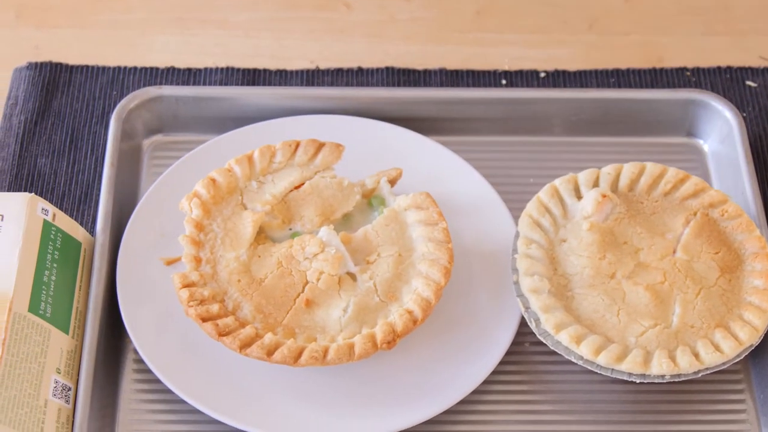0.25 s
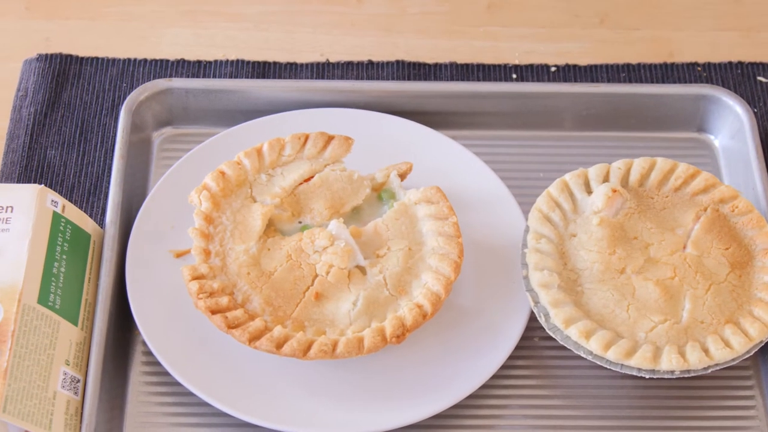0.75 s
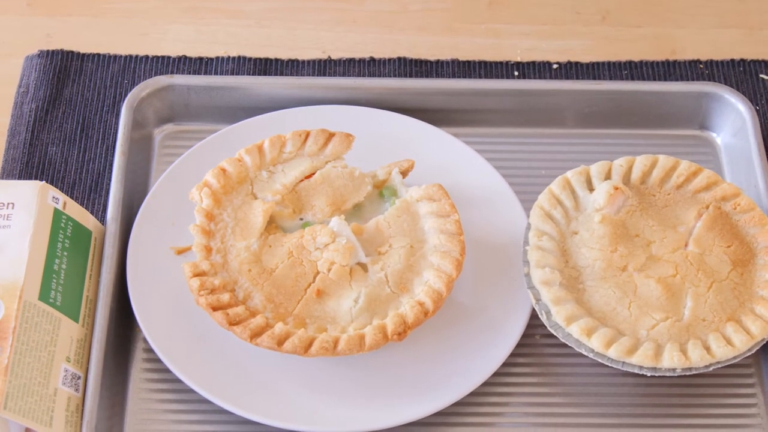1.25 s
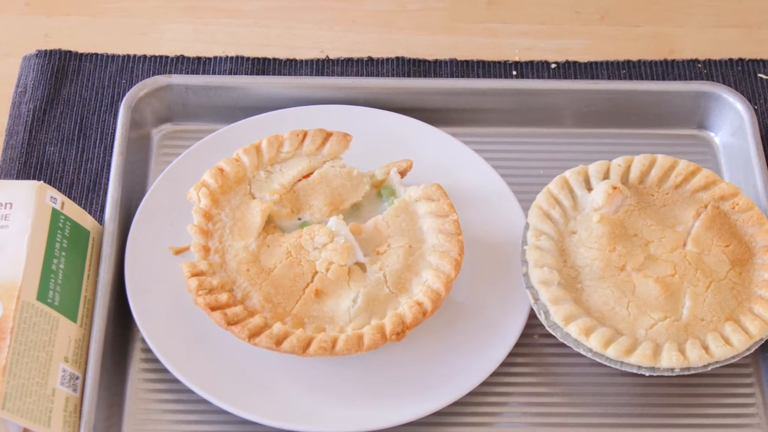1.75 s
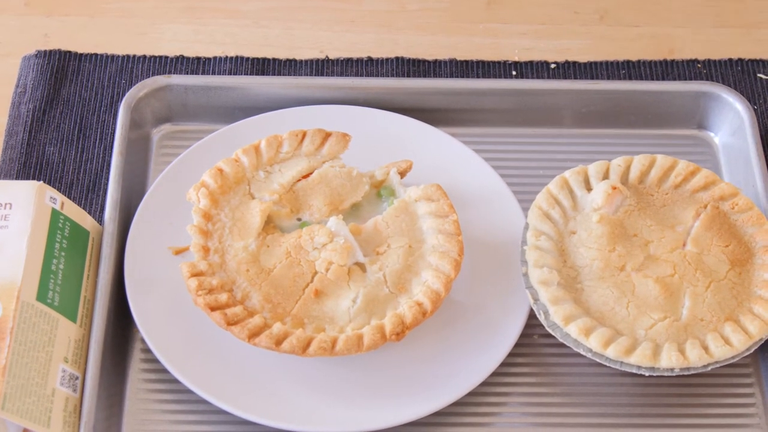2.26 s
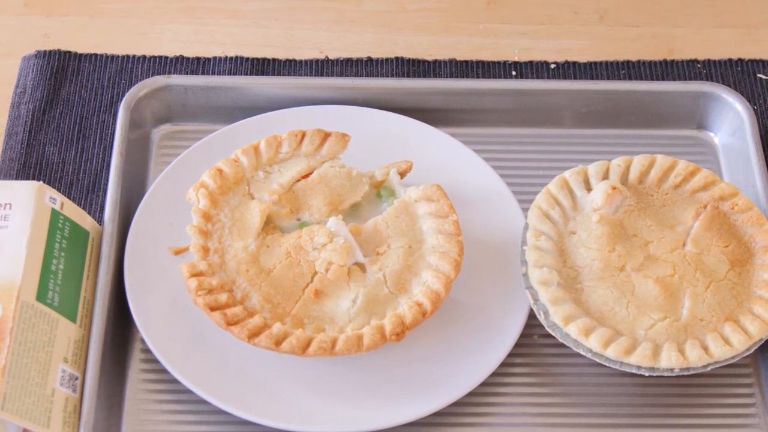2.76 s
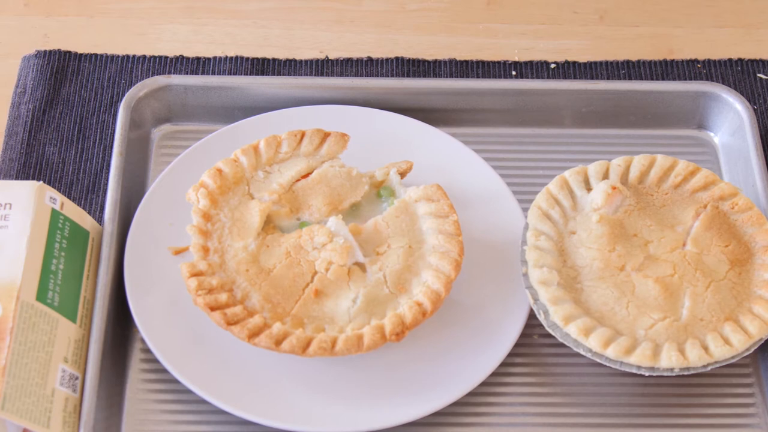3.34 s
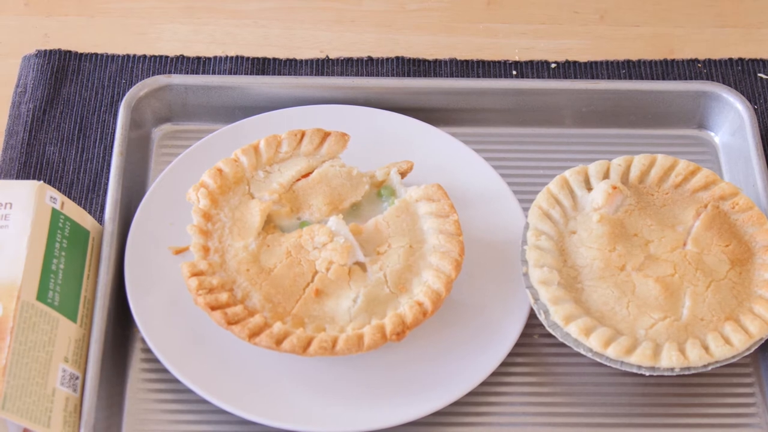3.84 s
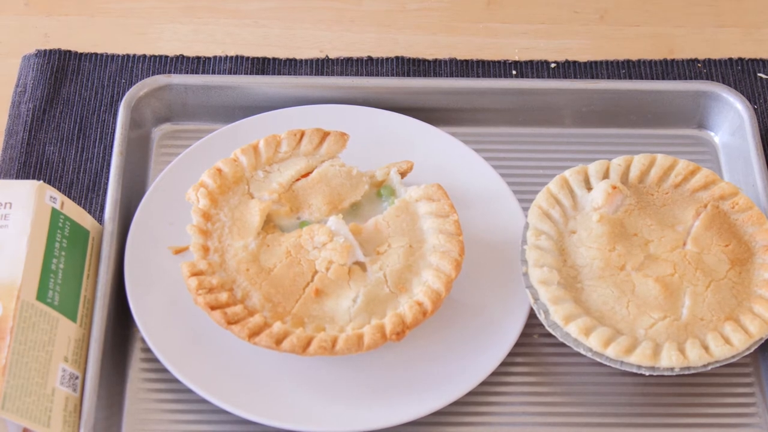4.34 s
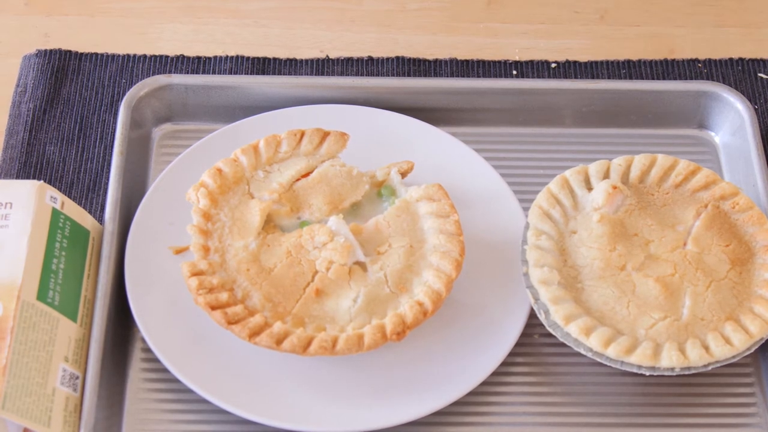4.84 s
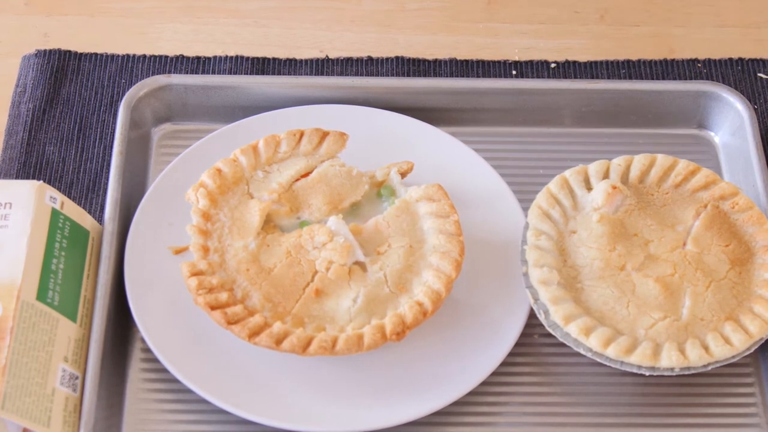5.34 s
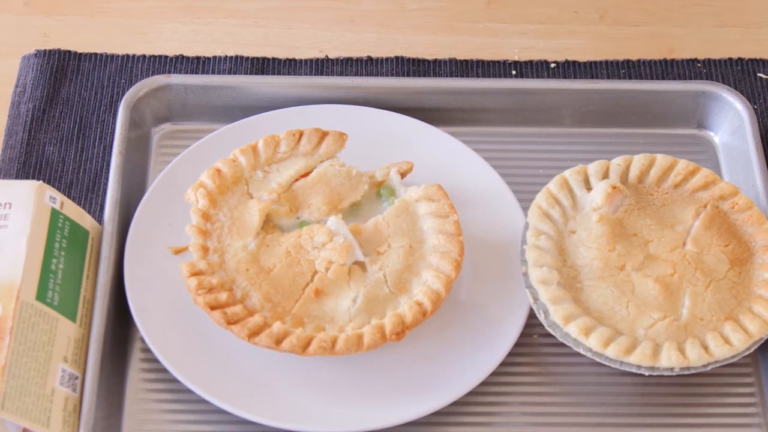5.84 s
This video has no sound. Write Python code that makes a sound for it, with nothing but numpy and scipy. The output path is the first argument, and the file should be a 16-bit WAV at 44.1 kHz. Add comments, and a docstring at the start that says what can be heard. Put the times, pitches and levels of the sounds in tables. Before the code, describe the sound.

A quiet kitchen carries a faint low hum and soft hiss throughout. Sleeves brush gently at about 0.1 to 0.3 seconds, and again near 1.2 and 1.6. Small, dull knocks on a wooden worktop come at 1.0, 1.3, 1.7 and 2.0 seconds, then a firmer group at 2.3 to 2.4. Very faint thin whistles pass at 2.2 and 2.8. From 3.0 metal utensils shift and rattle in a drawer, bursting into a loud, dense clatter from 3.3 to 3.7, with a bright steel clink at 3.4. A pan tone hangs on faintly, while light scrapes fade by 4.0. Soft bumps at 4.3 to 4.6 lead to a moderate rattle near 4.8, with crisp clinks and scrapes until 5.1. A small scrape follows at 5.25, a faint thin tone at 5.4, and light sliding metal around 6.0 to 6.1. Room reflections surround the blows, heard from moderate distance.

```python
"""A kitchen drawer and its load of utensils take a run of blows: each excites damped modes of the body.
Before it, cloth swishes and things knock on a wooden worktop; steel clinks, chatters and rings.
Utensils scrape as noise of many tiny slips, a pan decays slowly, and faint thin tones (whistles, and
a ring of metal after a clink) are narrow noise. Room reflections carry the blows, rubbing and thin
tones; the rings, pan and a low hum bypass the room.
"""
import sys
import numpy as np
from scipy import signal
from scipy.fft import rfft, irfft
from scipy.io import wavfile

SR = 44100
rng = np.random.default_rng(int(sys.argv[2]) if len(sys.argv) > 2 else 0)


def unload_wav(signal):
    """Save mono or channel-first audio to the path in sys.argv[1] as 16-bit WAV at rate SR, clipped to [-1, 1]."""
    wavfile.write(
        sys.argv[1],
        SR,
        np.round(np.clip(np.atleast_2d(signal).T, -1, 1) * 32767).astype(np.int16),
    )


N = 269451
T = np.arange(N) / SR  # time, s

# Levels of sources sent to the room are set before its reflections and direct path.
# things set down on the worktop: start_s, level_db, hardness_db, rattle_s
WORKTOP_KNOCKS = [(0.99, -57.5, 4, 0.011), (1.286, -63, 12.5, 0.0038), (1.746, -53, -1, 0.0051),
                  (2.035, -45.5, 1.5, 0.0076), (2.339, -40, 9.5, 0.00085), (2.363, -34, -7, 0.012),
                  (2.434, -44.5, -6, 0.0042)]
# blows of the drawer and its load: start_s, level_db, hardness_db, rattle_s
DRAWER_BLOWS = [(2.981, -37, -14, 0.02), (3.048, -40, -13, 0.0066), (3.117, -35.5, -10, 0.0077),
                (3.326, -32, 9.5, 0.021), (3.34, -21, -0.5, 0.015), (3.374, -20, -19, 0.059),
                (3.411, -20, -1.5, 0.00092), (3.467, -23.5, 3.5, 0.021), (3.513, -20.5, 5.5, 0.0005),
                (3.548, -20.5, 0.5, 0.0024), (3.581, -21.5, 0, 0.026), (3.684, -28, -17, 0.025),
                (4.316, -44, -38, 0.034), (4.378, -44.5, -4.5, 0.0052), (4.412, -40.5, -16, 0.012),
                (4.534, -44.5, -17, 0.021), (4.646, -41, -8, 0.009), (4.777, -31.5, -17, 0.034)]
# steel touching steel: start_s, tick_db, ring_db
STEEL_CLINKS = [(3.062, -42.5, -57), (3.239, -48, -79), (3.372, -44, -35), (3.407, -22.5, -31),
                (3.5, -30.5, -46), (3.679, -41, -57), (3.975, -43, -77), (4.644, -53.5, -59.5),
                (4.694, -40, -64), (4.746, -39, -54), (4.776, -38.5, -50), (4.907, -35.5, -50),
                (5.048, -34.5, -68)]
# utensils sliding over each other: peak_s, rise_s, level_db, treble_db
UTENSIL_SCRAPES = [(2.975, 0.014, -39, -8), (3.075, 0.034, -43, -20), (3.31, 0.051, -40.5, -5.5),
                   (3.425, .012, -23.5, -5), (3.72, 0.062, -38.5, -8), (3.855, 0.041, -38, -16),
                   (3.98, 0.038, -43.5, -12), (4.71, 0.012, -30.5, -12), (4.852, 0.036, -32, 3),
                   (4.915, 0.0051, -31.5, 1.5), (4.99, 0.047, -36, -4), (5.085, 0.014, -38.5, -18),
                   (5.25, 0.026, -42.5, 0.5), (6.0, 0.048, -40.5, -4.5), (6.11, 0.04, -35.5, 0)]
# sleeves brushing: peak_s, rise_s, level_db, treble_db
SLEEVE_SWISHES = [(.135, 0.042, -56, 4), (.29, 0.26, -63, 0), (1.15, 0.054, -57.5, -1.5),
                  (1.58, 0.079, -64, 8.5)]
# faint thin tones: whistles, and at 4.12 s a ring of metal after a clink: peak_s, centre_hz, level_db
THIN_TONES = [(2.23, 4760, -69), (2.80, 3280, -68.5), (4.12, 4770, -59.5), (5.39, 3780, -62)]
# short tones of things set down: start_s, pitch_hz, level_db
SET_DOWN_TONES = [(0.987, 382, -48.5), (2.034, 2670, -60.5), (2.034, 5180, -67)]
# sparse edges that catch during a scrape: per_s (mean rate, 1/s), spread_db (size spread, dB)
EDGE_CATCHES = dict(per_s=70, spread_db=4)

# modes of the worktop: pitch_hz, energy_share_db, t60_s
WORKTOP_MODES = [(241.5, -15.5, 0.093), (394, -32, 0.34), (560, -9.5, 0.13), (616.6, -4, 0.11),
                 (946, -8.5, 0.08), (1446, -18, 0.26), (2670, -21, 0.18), (3550, -15, 0.025)]
# modes of the drawer and its utensils: pitch_hz, energy_share_db, t60_s
DRAWER_MODES = [(300, -15, .25), (390, -14, .4), (540, -20, .2), (767, -17, .35), (924, -10, .3),
                (1139, -20, .35), (1298, -20, .35), (1330, -19, .4), (1630, -19, .4), (1960, -16, .35),
                (2044, -18, .3), (2105, -16, .3), (2360, -20, .35), (2469, -16, .4), (2542, -18, .3),
                (2812, -20, .3), (3270, -21, .2), (3408, -21, .2)]
# modes of the steel: pitch_hz, energy_share_db, t60_s
STEEL_MODES = [(5426, -15, .3), (6309, -15, .3), (6815, -4, .4), (7122, -14, .3), (8810, -10, .3),
               (9539, -14, .25), (9880, -15, .3), (10993, -4, .3), (12740, -13, .2), (14200, -21, .15)]
# modes of the pan, the lowest split in a beating pair: pitch_hz, relative_level_db, t60_s
PAN_MODES = [(882.5, -52, 5.0), (885.8, -61, 4.0), (1077, -58, 2.2), (1674, -53, 2.0), (2304, -58, 1.8)]
PAN_STRUCK_S, PAN_GAIN_DB = 3.512, 2.5

# spectrum of the crack on the worktop: frequency_hz, relative_level_db
KNOCK_SPECTRUM = [(40, -34), (120, -8.5), (250, 9.5), (600, 9.5), (1100, 10.5), (1900, 8.5), (2450, -1),
                  (3800, -7), (5000, -15), (8000, -26), (15000, -27)]
# spectrum of the crack on the drawer: frequency_hz, relative_level_db
BLOW_SPECTRUM = [(40, -16.5), (85, -23), (170, -23.5), (280, -2), (470, -2), (900, 3), (1450, 1), (2200, 3),
                 (3300, -7), (4800, -16), (9000, -26), (12000, -21.5), (15500, -53)]
# spectrum of the steel tick: frequency_hz, relative_level_db
TICK_SPECTRUM = [(60, -18), (400, -1.5), (1500, -3), (3800, 6), (5200, -5), (7500, 2.5), (11000, -3.5),
                 (15500, -17)]
# spectrum of the scraping metal: frequency_hz, relative_level_db
SCRAPE_SPECTRUM = [(60, -40.5), (250, -5.5), (700, 1.5), (1600, 9.5), (4000, 8.5), (5200, 7), (7200, 9),
                   (10000, 8), (12500, 3), (15500, -5)]
# spectrum of the cloth: frequency_hz, relative_level_db
CLOTH_SPECTRUM = [(100, -24), (700, -8), (1500, 5.5), (2500, 0.5), (3800, 2), (8000, -6.5), (11500, -1.5),
                  (15500, -21)]
# spectrum of the hiss: frequency_hz, relative_level_db
HISS_SPECTRUM = [(18, -81.5), (30, -18.5), (90, -42), (127, 1.5), (259, -4.5), (303, -3.5), (415, -9.5),
                 (512, 4), (649, -10), (937, -11), (2010, -12.5), (3400, -15), (3670, -14), (13000, -21.5),
                 (16000, -42.5)]
# resonances of the steady hum: centre_hz, width_hz, level_db
DRONE_RESONANCES = [(119.7, 2.2, -73), (310, 10, -78), (522, 210, -73)]

# decay of the kitchen: frequency_hz, t60_s
ROOM_DECAY = [(125, 0.7), (400, 0.6), (1000, 0.6559), (2500, 0.59), (6000, 0.53), (14000, 0.75)]
# stereo width of diffuse sound: frequency_hz, side_gain_db
STEREO_WIDTH = [(100, -17), (300, -20.5), (650, -15), (1300, -7.5), (5000, -7), (10000, -9.5), (14000, 1.5)]
# early reflections from nearby surfaces, over the late tail: frequency_hz, relative_level_db
EARLY_SPECTRUM = [(400, 10.5), (1400, -3.5), (3500, 1), (8000, 16)]
# straight path to the microphone: frequency_hz, relative_level_db
DIRECT_SPECTRUM = [(300, -27), (1200, -11), (2500, -6.5), (8000, -13), (14000, -1.5)]


def undb(db):
    """Amplitude ratio of a level: twenty decibels per factor of ten."""
    return 10 ** (np.asarray(db) / 20)


def unit(x):
    """Energy normalisation: the squares sum to one."""
    return x / np.sqrt(np.sum(x ** 2))


def contour(points, hz):
    """Linear interpolation of (Hz, value) points on a logarithmic frequency axis."""
    at, value = np.transpose(points)
    return np.interp(np.log(np.maximum(hz, 1)), np.log(at), value)


def response(points, size=2048):
    """Minimum-phase principle: folding the cepstrum makes a (Hz, dB) spectrum causal."""
    gain = undb(contour(points, np.fft.rfftfreq(size, 1 / SR)))
    cepstrum = irfft(np.log(gain))
    cepstrum[1:size // 2] *= 2
    cepstrum[size // 2 + 1:] = 0
    return irfft(np.exp(rfft(cepstrum)))


def through(x, h):
    """Linear filtering: convolution of a sound with an impulse response."""
    return signal.fftconvolve(x, h)[:N]


def add(track, s, x):
    """Superposition: a short sound joins a track at time s."""
    i = int(s * SR)
    track[i:i + len(x)] += x[:N - i]


def decay(t, t60):
    """Exponential damping: the amplitude falls by 60 dB in t60 seconds."""
    return np.exp(-np.log(1000) * t / t60)


def ring(modes, detune=0, scatter_db=0):
    """Free decay of modes: strike point and support shift their weights and pitches."""
    t = T[:SR // 2]
    out = np.zeros(len(t))
    for hz, db, t60 in modes:
        weight_shift, pitch_shift = rng.standard_normal(2)
        pitch = hz * (1 + detune * pitch_shift)
        mode = unit(np.cos(2 * np.pi * pitch * t) * decay(t, t60))
        out += undb(db + scatter_db * weight_shift) * mode
    return out


def body(spectrum, modes, crack_db, ring_db, detune):
    """Impulse response of a struck body: a short broad crack and its modal decay."""
    h = undb(ring_db) * ring(modes, detune, scatter_db=0.5)
    add(h, 0, undb(crack_db) * unit(response(spectrum)))
    return h


def narrow(hz, width):
    """Resonance selects a narrow band from white noise; the rms is one."""
    f = np.fft.rfftfreq(N, 1 / SR)
    resonance = 1 / (1 + ((f - hz) / width) ** 2) ** 2
    band = irfft(rfft(rng.standard_normal(N)) * resonance, N)
    return np.sqrt(N) * unit(band)


def contact(db, hard_db, firm_db, thud, click, treble_db):
    """Contact stiffness sets the force spectrum: hard pushes carry more treble."""
    # for each dB under a firm blow, thud and click stand out more against the body
    light_db = firm_db - db
    thud_db = thud * light_db
    top_db = hard_db + treble_db + click * light_db
    shape = [(160, -2), (280, thud_db), (400, thud_db), (620, 0.086), (1300, -0.17),
             (2800, hard_db), (8000, top_db), (15000, top_db - 6)]
    return np.sqrt(SR / 20) * undb(db) * response(shape)  # level referred to 50 ms


def grains(per_s, spread_db):
    """Stick-slip as a random pulse train: uneven slips at random moments, rms one."""
    size = undb(spread_db * np.clip(rng.standard_normal(N), -2, 2))
    happens = rng.random(N) < per_s / SR
    sign = np.sign(rng.standard_normal(N))
    return np.sqrt(N) * unit(happens * sign * size)


def rub(strokes, spectrum, grit, fall_share):
    """Friction noise swells with each stroke and fades in a share of its rise time."""
    rough = through(grit, unit(response(spectrum)))
    high_pass = signal.butter(1, 5000, "high", fs=SR, output="sos")
    treble = signal.sosfilt(high_pass, rough)
    out = np.zeros(N)
    for peak_s, rise_s, db, treble_db in strokes:
        spread_s = np.where(T < peak_s, rise_s, fall_share * rise_s)
        swell = np.exp(-.5 * ((T - peak_s) / spread_s) ** 2)
        out += undb(db) * swell * (rough + (undb(treble_db) - 1) * treble)
    return out


def rattle(length_s, bounce_db=-29, soft_s=0.017):
    """Repeated impact: a first contact, weaker for a longer tumble, and dying bounces."""
    t = T[:SR // 5]
    bounces = grains(per_s=400, spread_db=1.5)[:len(t)]
    force = undb(bounce_db) * bounces * np.exp(-t / length_s)
    force[0] = np.exp(-length_s / soft_s)
    return unit(force)


def stereo(mid, side):
    """Spatial coherence of diffuse sound: alike on both sides in the bass, wider in the treble."""
    side = through(side, response(STEREO_WIDTH))[:len(mid)]
    return np.array([mid + side, mid - side])


def hum():
    """Steady resonance: an appliance drones over soft, even hiss."""
    hiss_db, side_db = -62.5, 1
    hiss = unit(response(HISS_SPECTRUM))
    mid = undb(hiss_db) * through(rng.standard_normal(N), hiss)
    side = undb(hiss_db + side_db) * through(rng.standard_normal(N), hiss)
    drone = sum(undb(db) * narrow(hz, width) for hz, width, db in DRONE_RESONANCES)
    return stereo(mid + drone, side)


def swishes():
    """Friction of cloth: a dense stream of slips coloured by the fabric of brushing sleeves."""
    slips = grains(per_s=4000, spread_db=10.5)
    return rub(SLEEVE_SWISHES, CLOTH_SPECTRUM, slips, fall_share=0.71)


def rings(tone_t60=0.51):
    """Lightly damped vibration: steel rings after each clink, and things set down sound short tones."""
    out = np.zeros(N)
    for s, hz, db in SET_DOWN_TONES:
        add(out, s, ring([(hz, db, tone_t60)]))
    for s, _, ring_db in STEEL_CLINKS:
        add(out, s, undb(ring_db) * ring(STEEL_MODES, detune=.001, scatter_db=2))
    return np.sqrt(SR / 20) * out  # levels referred to 50 ms


def knocks():
    """Impact excitation of wood: the modes shift a little as each blow finds another spot."""
    out = np.zeros(N)
    for s, db, hard_db, length_s in WORKTOP_KNOCKS:
        push = contact(db, hard_db, firm_db=-42, thud=0.49, click=0.65, treble_db=-4)
        force = through(rattle(length_s), push)
        wood = body(KNOCK_SPECTRUM, WORKTOP_MODES, crack_db=-2.5, ring_db=-3.0, detune=0.02)
        add(out, s, through(force, wood))
    return out


def thin_tones(spread_s=.04):
    """Narrow-band noise under a Gaussian envelope is heard as a brief, faint tone."""
    out = np.zeros(N)
    for peak_s, hz, db in THIN_TONES:
        swell = np.exp(-.5 * ((T - peak_s) / spread_s) ** 2)
        out += undb(db) * swell * narrow(hz, 370)
    return out


def scrapes(ring_db=-14, catch_db=-15):
    """Stick-slip of metal: slips and the ticks of catching edges also drive the load's modes."""
    slips = grains(per_s=2600, spread_db=16.0)
    grit = slips + undb(catch_db) * grains(**EDGE_CATCHES)
    slide = rub(UTENSIL_SCRAPES, SCRAPE_SPECTRUM, grit, fall_share=0.57)
    return slide + undb(ring_db) * through(slide, ring(DRAWER_MODES))


def drawer():
    """Repeated impact: the loose load bounces, and every bounce rings the drawer and its utensils."""
    out = np.zeros(N)
    for s, db, hard_db, length_s in DRAWER_BLOWS:
        push = contact(db, hard_db, firm_db=-21, thud=.24, click=0.42, treble_db=-1.5)
        force = through(rattle(length_s), push)
        loaded = body(BLOW_SPECTRUM, DRAWER_MODES, crack_db=-1.5, ring_db=-3, detune=0.0034)
        add(out, s, through(force, loaded))
    return out


def clinks(chatter_s=0.00056):
    """Contact chatter: a burst of decaying random force gives each bright steel tick."""
    out, t = np.zeros(N), T[:SR // 20]
    tick = unit(response(TICK_SPECTRUM))
    for s, tick_db, _ in STEEL_CLINKS:
        chatter = unit(rng.standard_normal(len(t)) * np.exp(-t / chatter_s))
        add(out, s, undb(tick_db) * through(chatter, tick))
    return np.sqrt(SR / 20) * out  # levels referred to 50 ms


def pan():
    """Slow modal decay: a struck pan's pure tones hang on, its close lowest pair beating."""
    t = np.maximum(T - PAN_STRUCK_S, 0)
    out = np.zeros(N)
    for hz, db, t60 in PAN_MODES:
        out += undb(db + PAN_GAIN_DB) * np.sin(2 * np.pi * hz * t) * decay(t, t60)
    return np.sqrt(2) * out  # sine amplitude from rms


def kitchen(x, direct_db, early_db, early_s=0.014, build_s=0.00032):
    """Room acoustics: a direct path, early reflections, then a tail whose decay depends on frequency."""
    t = T[:SR]
    hz = np.fft.rfftfreq(SR, 1 / SR)
    centres = np.geomspace(60, 16000, 9)
    noise = rfft(rng.standard_normal((2, SR)))
    reflections = np.zeros((2, SR))
    for centre, pick in zip(centres, np.eye(len(centres))):
        # a triangular band on the log-frequency axis
        band = irfft(noise * contour(np.c_[centres, pick], hz), SR)
        late = decay(t, contour(ROOM_DECAY, centre))
        early = undb(early_db + contour(EARLY_SPECTRUM, centre)) * np.exp(-t / early_s)
        build_up = 1 - np.exp(-t / build_s)
        reflections += band * unit((early + late) * build_up)
    mid, side = reflections
    add(mid, 0, undb(direct_db) * response(DIRECT_SPECTRUM))
    return np.array([through(x, h) for h in stereo(mid, side)])


def scene():
    """Superposition: two source groups have their own room balance; rings, pan and hum bypass it."""
    worktop_side = kitchen(swishes() + knocks() + thin_tones(), direct_db=2.0, early_db=-9.0)
    drawer_side = kitchen(scrapes() + drawer() + clinks(), direct_db=0.0, early_db=-4.5)
    return worktop_side + drawer_side + rings() + pan() + hum()


def record(dry, low_cut_hz=85, top_hz=15500):
    """Band limiting: the deep bass is thinned and the top cut steeply."""
    high_pass = signal.butter(2, low_cut_hz, "high", fs=SR, output="sos")
    low_pass = signal.ellip(10, .2, 80, top_hz, fs=SR, output="sos")
    return signal.sosfilt(low_pass, signal.sosfilt(high_pass, dry))


dry = scene()
out = record(dry)
unload_wav(out)
```